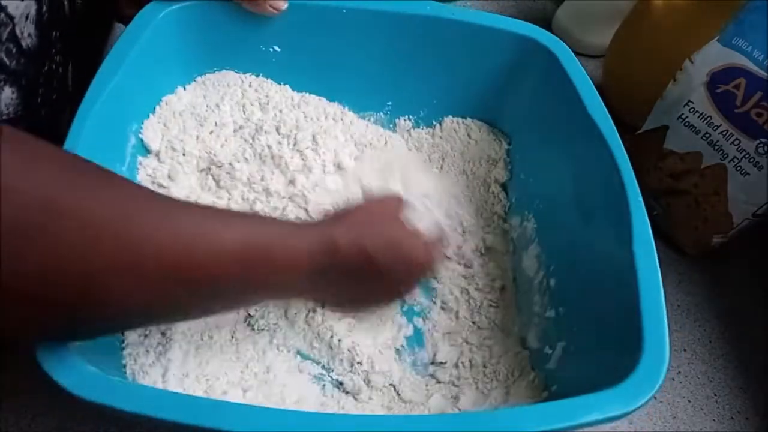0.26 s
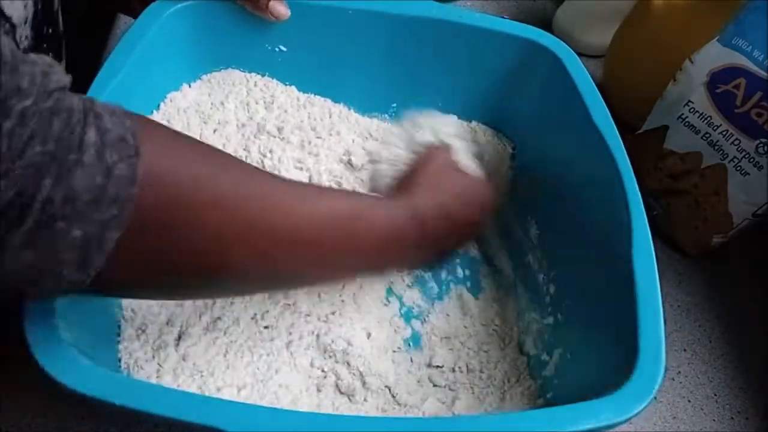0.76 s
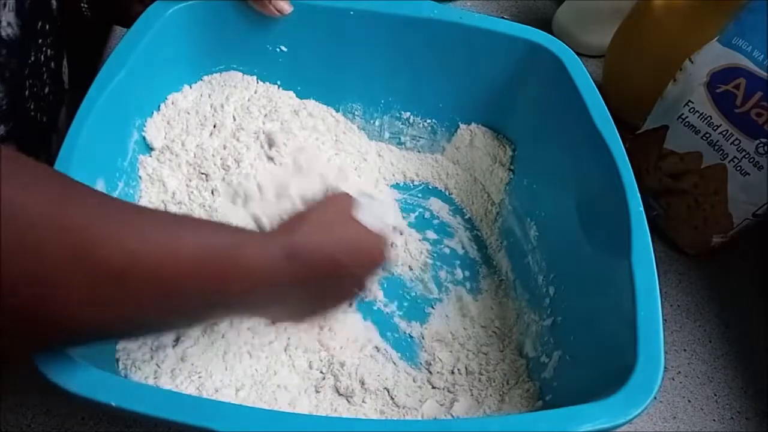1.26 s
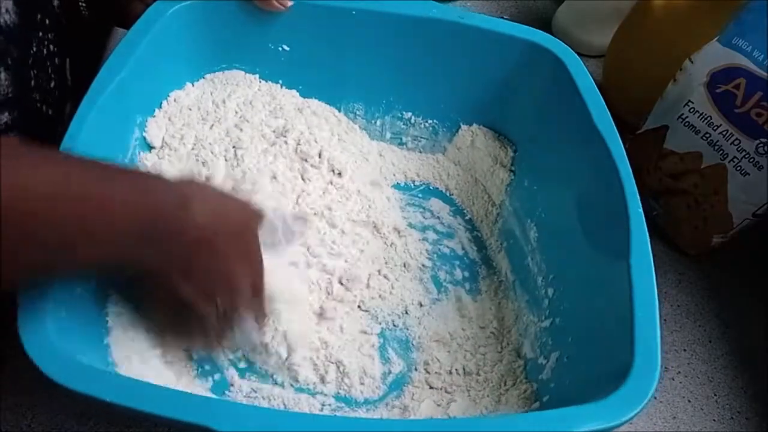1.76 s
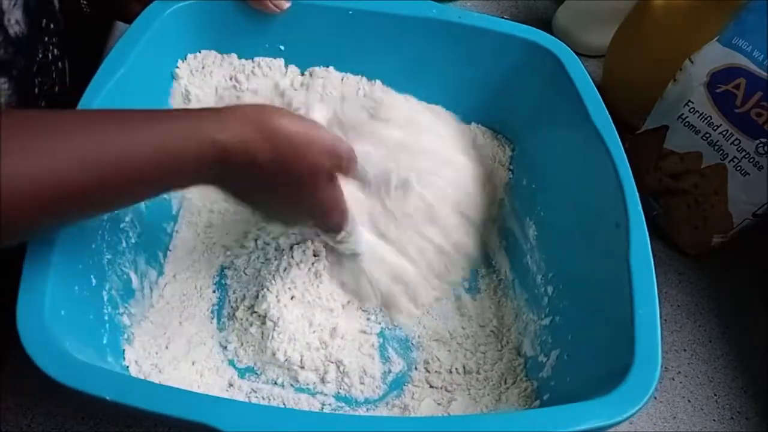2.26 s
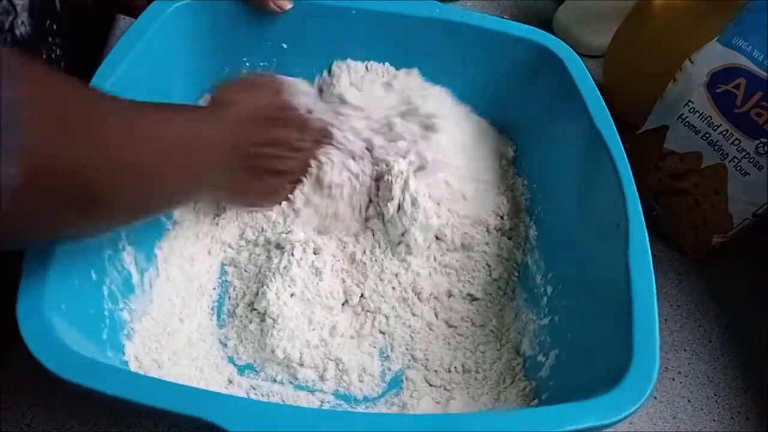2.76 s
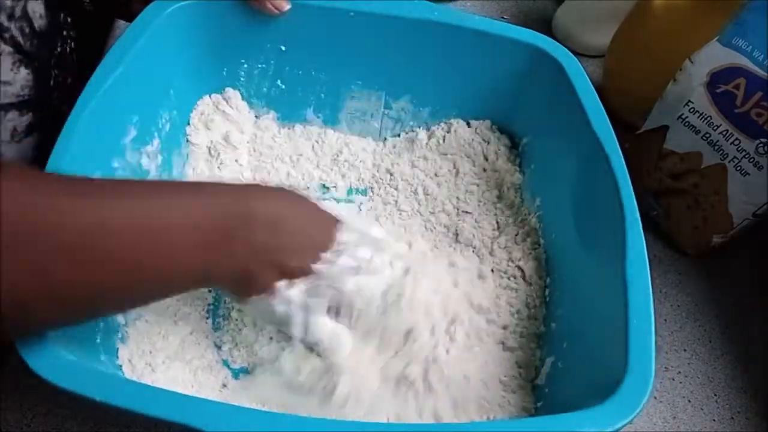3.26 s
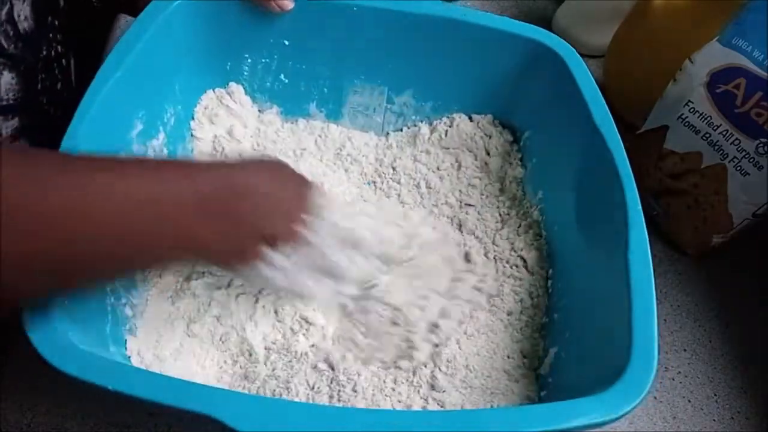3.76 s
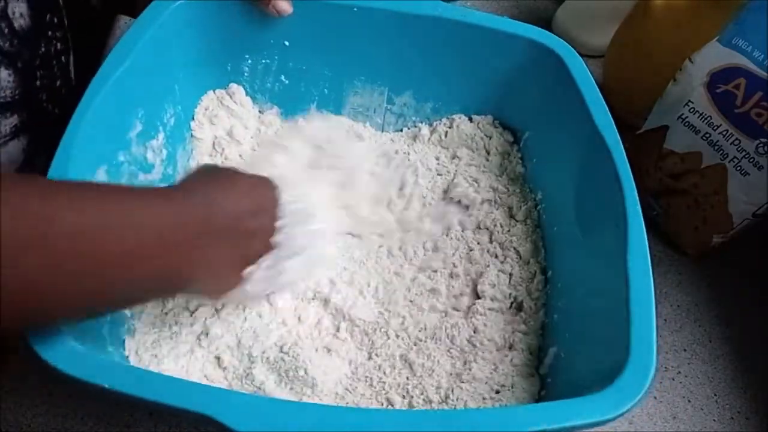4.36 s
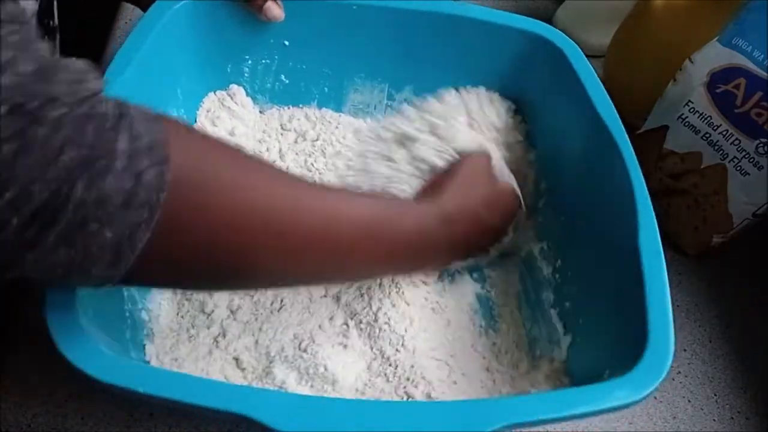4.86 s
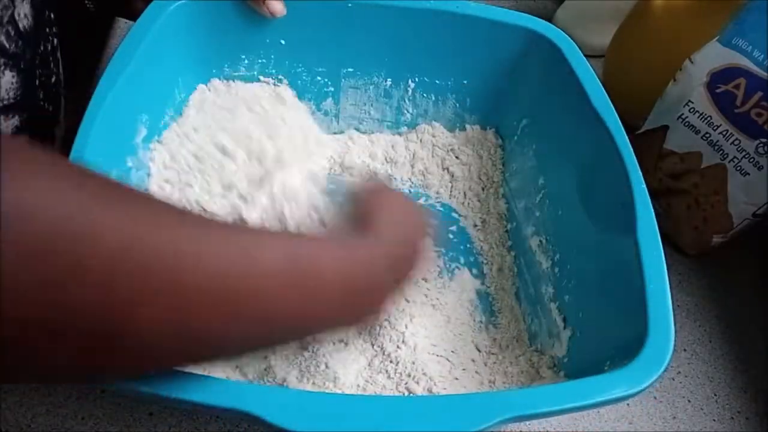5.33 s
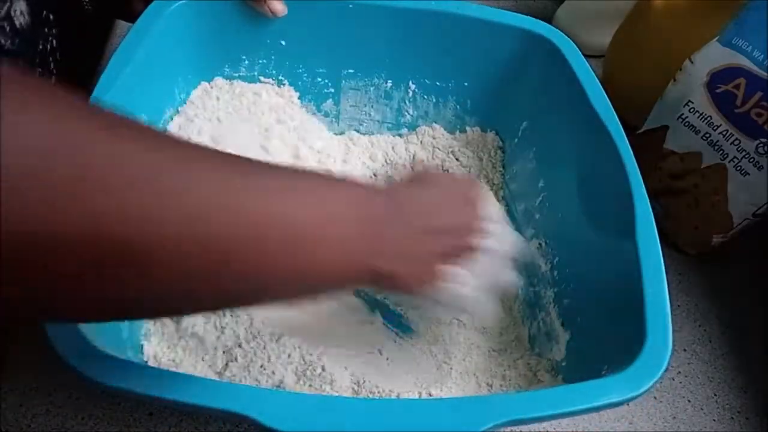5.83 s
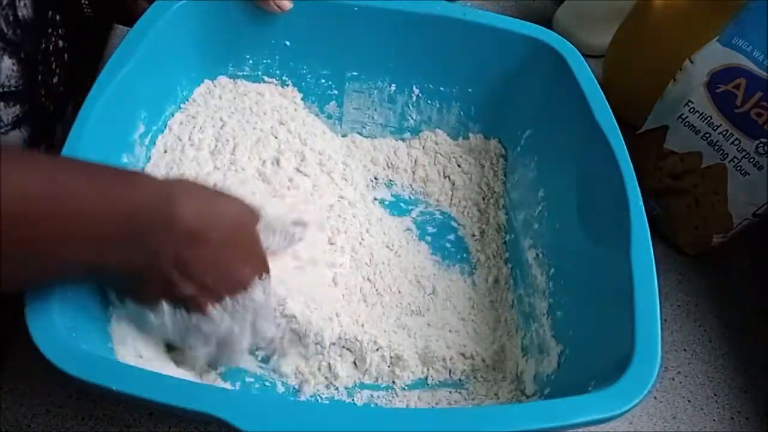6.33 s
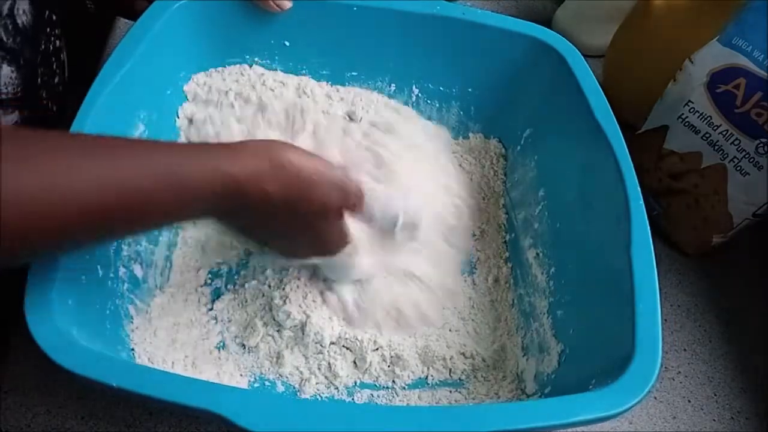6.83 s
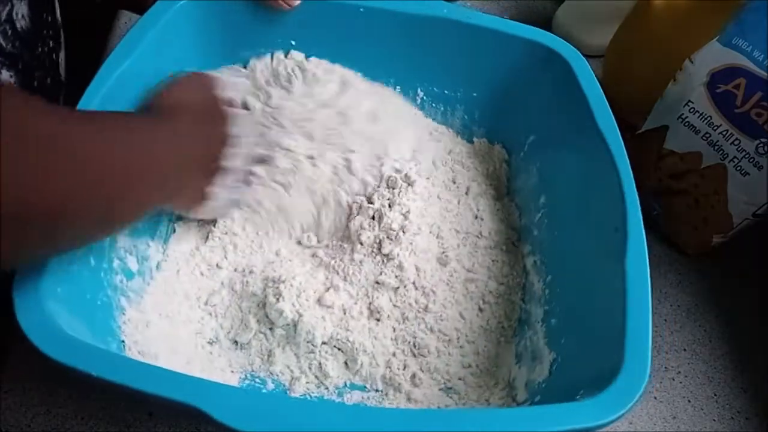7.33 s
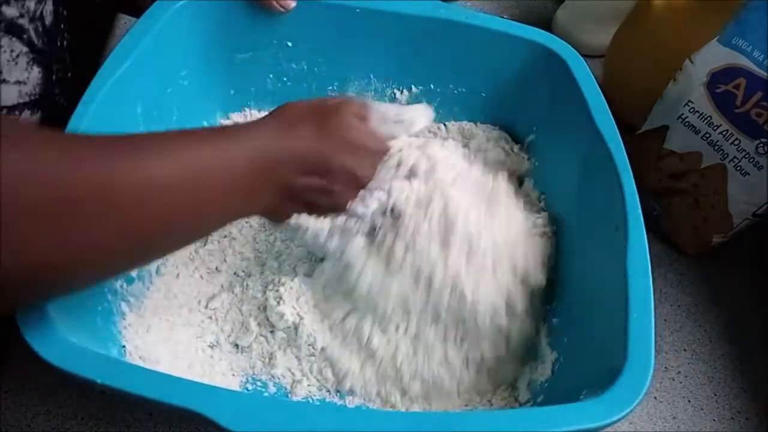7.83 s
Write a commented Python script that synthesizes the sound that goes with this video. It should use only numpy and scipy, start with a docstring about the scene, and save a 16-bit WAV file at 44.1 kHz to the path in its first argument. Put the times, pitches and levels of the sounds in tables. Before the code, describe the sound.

Close above a plastic basin in a small kitchen, a hand stirs dry flour for about eight seconds. Quick strokes of 0.1 to 0.3 seconds begin at once, each a soft, grainy hiss with fingers rasping on plastic and the floor drumming low. Dull thumps and knocks cluster at 0.1, 0.65 and 1.15 seconds; nails scrape around 0.75 and 1.5 to 1.7. From about 1.9 it is sparser, with a knock at 2.25, a faint hollow pop at 2.5 and a scrape at 2.9. Brisk swishes return from 3.35, with a strong knock at 3.7 and another at 4.65. A sharp scrape comes at 5.1, then short strokes near 5.5 and a longer one at 6. Knocks soften; a bright powdery sweep starts at 7.3, a loud, short hollow pop follows at 7.5 with a scrape, and a last light swish at 8. Short room reverberation and faint rumble remain.

```python
"""In a small kitchen, heard from just above, a hand stirs dry flour round a plastic basin.
Each stroke shears the powder into a hiss, rasps the fingers over the plastic and drums the basin's floor,
all made of random clicks that are filtered or drive resonances. Knocks excite decaying modes and short
noise cracks, and nails scrape. One faint hollow pop and, near the end, a loud one ring a pair of resonators
in cascade; a diffuse reverberant field and a faint low rumble surround the basin."""
import sys
import numpy as np
from scipy import signal
from scipy.fft import rfft, irfft
from scipy.io import wavfile

SR = 44100
rng = np.random.default_rng(int(sys.argv[2]) if len(sys.argv) > 2 else 0)


def wav_out(sig):
    """Save sig, one row per channel (or a flat mono array), as 16-bit PCM at SR to the path in sys.argv[1]."""
    wavfile.write(sys.argv[1], SR, np.round(np.clip(np.atleast_2d(sig).T, -1, 1) * 32767).astype(np.int16))


N = 356892
TIME = np.arange(N) / SR


def from_db(db):
    """Logarithmic level: 20 dB is a factor of ten in amplitude."""
    return 10 ** (np.asarray(db) / 20)


def rms_one(x):
    """Normalisation: scale to unit mean power."""
    return x / np.sqrt(np.mean(x ** 2) + 1e-20)


def at_hz(points, hz):
    """Interpolation of a spectrum along a logarithmic frequency axis."""
    f, value = np.transpose(points)
    return np.interp(np.log(np.maximum(hz, 1)), np.log(f), value)


def colour(x, spectrum, size=2048):
    """Minimum-phase filtering: folding the cepstrum gives a causal filter with the stated spectrum."""
    bins_hz = np.arange(size + 1) * SR / (2 * size)
    log_gain = at_hz(spectrum, bins_hz) * np.log(10) / 20
    cepstrum = irfft(log_gain)
    cepstrum[1:size] *= 2
    cepstrum[size + 1:] = 0
    impulse_response = irfft(np.exp(rfft(cepstrum)))
    return signal.oaconvolve(x, impulse_response)[:len(x)]


def drift(rate):
    """Random modulation: chance values, `rate` per second, joined by lines and scaled to unit rms."""
    knots = rng.standard_normal(4096)
    return rms_one(np.interp(TIME * rate, np.arange(len(knots)), knots))


def ring(force, hz, t60):
    """Damped resonance: a unit click starts a sine of height 1 that decays by 60 dB in t60."""
    r = from_db(-60 / (t60 * SR))
    w = 2 * np.pi * hz / SR
    return signal.lfilter([0, np.sin(w)], [1, -2 * r * np.cos(w), r * r], force + 1e-18)


def grains(per_s, spread_db):
    """Granular excitation: random clicks of uneven size and sign, at unit power."""
    sizes = from_db(spread_db * np.minimum(rng.exponential(1, N), 4))
    signs = rng.choice([-1, 1], N)
    return rms_one(sizes * signs * (rng.random(N) < per_s / SR))


# A stroke's shape: flour gives way at once, the speed arches, each sound fades as the hand lifts.
ATTACK_S, ATTACK_DB = 0.023, 14.5
HISS_ARCH_DB, HISS_RELEASE_DB_PER_S = 3.5, 207
RASP_ARCH_DB, RASP_RELEASE_DB_PER_S = 3.5, 102.5
DRUM_ARCH_DB, DRUM_RELEASE_DB_PER_S = 4, 69
RASP_EASING_DB, DRUM_EASING_DB = 3.5, 6  # the pressure on the plastic eases over a stroke

# The hand's strokes through the flour; the levels are those before shaping and later trims.
# Columns: start t/s, length t/s, swell from start to end level/dB,
# powder hiss level/dB, finger rasp level/dB, floor drumming level/dB
STROKES = [(0.132, 0.12, 14.5, -54, -50, -43.5), (0.55, .03, 0, -69.5, -78, -75),
           (0.611, 0.19, 5, -48.5, -50, -45), (0.769, 0.14, 14.5, -56, -58, -55.5),
           (1.106, 0.13, 15.5, -56.5, -57, -42.5), (1.498, 0.14, 16, -54, -63, -54),
           (1.723, 0.24, -9.5, -62, -60.5, -59), (1.93, 0.32, -2, -67.5, -73, -94),
           (2.486, 0.079, 9.5, -63, -59.5, -55.5), (2.591, 0.31, 12.5, -51.5, -64.5, -63),
           (3.09, 0.22, 5, -90, -71.5, -88), (3.368, 0.13, -5.5, -56.5, -61, -54.5),
           (3.553, 0.14, 4.5, -52.5, -75, -59.5), (3.724, 0.26, -5, -55.5, -58, -52),
           (4.081, 0.2, -3.5, -50.5, -67.5, -51.5), (4.235, 0.18, 11.5, -51.5, -58.5, -50.5),
           (4.616, 0.29, 12.5, -53, -52, -50), (5.01, .2, 5.5, -50, -56.5, -60),
           (5.475, 0.099, 1, -47, -55.5, -45), (5.606, 0.084, -13, -55, -75, -51.5),
           (5.921, 0.057, -1, -63, -61, -69), (5.982, 0.3, -2.5, -51, -51.5, -53),
           (6.357, 0.3, -17, -60.5, -64, -66), (6.647, 0.14, 6, -63, -72, -91),
           (7.043, 0.17, 10, -54, -61, -62.5), (7.268, 0.3, 9.5, -46.5, -56.5, -60),
           (8.018, 0.12, 5, -54, -66, -79)]


def stroke_level(levels_db, arch_db, easing_db, release_db_per_s):
    """Envelope of friction: attack, arch and linear release in dB; overlapping strokes add in power."""
    power = np.full(N + SR, 1e-12)
    t = TIME[:SR]
    for (start, length, swell_db, *_), db in zip(STROKES, levels_db):
        way = np.minimum(t / length, 1) - .5  # from -1/2 at the start to 1/2 at the end
        attack = ATTACK_DB * np.minimum(t / ATTACK_S - 1, 0)
        arch = (swell_db - easing_db) * way - arch_db * (2 * way) ** 2
        release = release_db_per_s * np.maximum(t - length, 0)
        power[int(start * SR):][:len(t)] += from_db(2 * (db + attack + arch - release))
    return 10 * np.log10(power[:N])


# Spectrum of the sheared flour. Columns: f/Hz, relative level/dB per Hz
POWDER = [(300, 0), (1000, 0), (2000, 3), (3800, 2), (5000, -3), (6600, -2), (7700, -10), (8800, 3.5),
          (10500, -2.5), (12500, -6), (13700, -5.5), (15000, 5), (16000, 5)]


def powder(hiss_db):
    """Granular shear: countless particles slide past each other in small uneven slides."""
    slides = from_db(2.4 * drift(45))
    grain_noise = rms_one(colour(grains(7000, 4.9), POWDER))
    hiss = from_db(hiss_db - 0.3) * slides * grain_noise
    return diffuse(hiss, POWDER, wet_db=15.5, t60=0.27)


def diffuse(x, spectrum, wet_db, t60):
    """Diffuse field: the moving hand's echoes blur into a like-coloured wash, unrelated at the two ears."""
    r = from_db(-120 / (t60 * SR))  # decay of power, hence twice 60
    energy = signal.lfilter([1 - r], [1, -r], x ** 2)
    wash = np.array([rms_one(colour(rng.standard_normal(N), spectrum)) for _ in range(2)])
    mixed = x + from_db(wet_db) * np.sqrt(energy) * wash
    return mixed / np.sqrt(1 + from_db(2 * wet_db))


# Spectrum of fingers on plastic. Columns: f/Hz, relative level/dB per Hz
RASP = [(60, -2), (240, -2), (350, -2), (700, 2.5), (1000, -3), (1450, -5), (1900, -4), (2600, -13.5),
        (4500, -18.5), (9000, -23.5)]


def rasp(rasp_db):
    """Stick-slip friction: floury fingers catch and release on the plastic."""
    catches = from_db(3.24 * drift(60))
    friction = rms_one(colour(grains(1000, 2.1), RASP))
    return from_db(rasp_db - 1.26) * catches * friction


SKID_DB, SKID_FALL_DB_PER_S = -21, 224  # rasp relative to the wall knock, and its decay


def with_skids(rub_db):
    """Power addition: after each knock the hand skids on, on top of the steady rubbing; level in dB."""
    power = from_db(2 * rub_db)
    t = TIME[:SR // 2]
    for s, wall_db, *_ in KNOCKS:
        skid_db = wall_db + SKID_DB - SKID_FALL_DB_PER_S * t
        power[int(s * SR):][:len(t)] += from_db(2 * skid_db)
    return 10 * np.log10(power)


# The basin's modes, damped by its load; drumming shortens the decay times.
# Columns: f/Hz, relative level/dB, reverberation time t60/s
BASIN = [(71.7, -8, 0.29), (105.3, -3.5, 0.36), (121.4, 3.5, 0.22), (160.8, -5.5, 0.26), (238, -4.5, 0.12),
         (278.4, -6, 0.069), (389.7, -9.5, 0.12), (510, -5, 0.049), (632, -4.5, 0.045), (759, -9, 0.073),
         (866, -14, 0.055), (1260, -18.5, 0.044)]


def drumming(drum_db):
    """Forced vibration: the dragging hand shakes the basin's six lowest modes."""
    band = signal.butter(2, [65, 200], "band", fs=SR, output="sos")
    drag = signal.sosfilt(band, grains(300, 1.0))
    floor = 0
    for k, (hz, db, t60) in enumerate(BASIN[:6]):
        polarity = (-1) ** k
        floor = floor + polarity * from_db(db) * ring(drag, hz, t60 * 0.74)
    return from_db(drum_db - 2.0) * rms_one(floor)


# Hand against basin; nominal levels, which the playing functions trim, vary or stretch.
# Columns: onset t/s, walls' knock level/dB, deep thud level/dB, hard clack level/dB
KNOCKS = [(0.039, -41, -39.5, -58), (0.115, -39, -41, -57), (0.144, -30, -27.5, -52.5),
          (0.621, -39, -35, -57.5), (0.675, -32, -41, -64), (1.139, -32.5, -31, -49.5),
          (1.168, -30, -31, -42.5), (1.697, -38, -45.5, -60), (1.828, -75, -50.5, -62),
          (2.252, -36, -33, -48), (3.335, -38, -40, -62), (3.681, -27, -29, -53), (3.952, -43, -48, -64),
          (4.11, -37, -39, -56), (4.419, -42.5, -38, -50), (4.636, -38.5, -43, -86),
          (4.665, -30, -36.5, -50), (5.465, -36.5, -40.5, -60), (5.502, -43.5, -37, -50.5),
          (5.968, -44.5, -48.5, -70), (6.08, -54, -42.5, -50), (6.377, -51.5, -48, -58),
          (6.8, -55.5, -46.5, -68), (7.065, -52, -60, -65)]


def knocks():
    """Modal excitation: each blow bends the soft floor and rings the stiffer walls."""
    out = np.zeros(N)
    t = TIME[:SR // 2]
    hz, mode_db, t60 = np.transpose(BASIN)[:, :, None]
    stiff = np.clip(np.log2(hz / 150) / 1.23, 0, 1)  # 0 for modes of the floor, 1 for those of the walls
    for s, wall_db, thud_db, _ in KNOCKS:
        place, load = rng.standard_normal((2, len(BASIN), 1))
        pitch = hz * (1 + (0.023 + 0.041 * stiff) * load)  # the shifting flour retunes the modes
        blow_db = (1 - stiff) * (thud_db + 0.2) + stiff * (wall_db + 0.8)
        place_db = (1.23 + 0.74 * stiff) * place
        gain = from_db(mode_db + blow_db + place_db)
        sign = np.where(stiff < .5, 1, rng.choice([-1, 1], hz.shape))
        swell = 1 - np.exp(-t * hz / 0.75)  # flesh hands over its push within a few cycles
        decay = from_db(-60 * t / t60)
        modes = sign * gain * swell * decay * np.sin(2 * np.pi * pitch * t)
        speed = np.diff(modes, prepend=0) * SR / (2 * np.pi * pitch)  # the air follows the plastic's speed
        out[int(s * SR):][:len(t)] += speed.sum(axis=0)
    return out


# Spectrum of a hard contact. Columns: f/Hz, relative level/dB per Hz
CLACK = [(60, -24), (300, 1.5), (800, 6), (1300, 3), (1900, -0.5), (3300, -12.5), (4700, -32.5),
         (12000, -60)]


def clacks(hardening=0.33):
    """Nonlinear contact: knuckles and nails crack briefly, hard blows out of proportion."""
    out = np.zeros(N)
    t = TIME[:SR // 20]
    contact = np.exp(-t / .0011)
    for s, _, _, clack_db in KNOCKS:
        crack = colour(rng.standard_normal(len(t)) * contact, CLACK)
        level_db = clack_db + hardening * (clack_db + 40)
        out[int(s * SR):][:len(t)] += from_db(level_db) * rms_one(crack)
    return out


SCRAPE_RISE_DB, SCRAPE_FALL_DB_PER_S = 14.5, 253  # gained over the rise; lost afterwards

# Spectrum of grit under a nail. Columns: f/Hz, relative level/dB per Hz
GRIT = [(150, -9.5), (400, -1), (750, 4), (1100, 0.5), (1900, -1), (2700, -11), (4000, -18), (9000, -28)]

# Nails break through to the bare plastic and scrape. Columns: peak t/s, level/dB, rise t/s
SCRAPES = [(0.75, -46.5, .03), (1.532, -50.5, 0.019), (1.571, -47, 0.0077), (1.662, -46, 0.018),
           (2.239, -58, 0.042), (2.4, -67.5, 0.027), (2.906, -44.5, 0.054), (3.73, -55.5, 0.018),
           (4.423, -63, 0.025), (5.118, -41.5, 0.014), (6.13, -50, .03), (7.57, -44.5, 0.034)]


def scrapes():
    """Abrasive friction: a nail bites, grinds over coarse grit and slides off."""
    level = 0
    for s, db, rise_s in SCRAPES:
        before = SCRAPE_RISE_DB * (s - TIME) / rise_s
        after = SCRAPE_FALL_DB_PER_S * (TIME - s)
        drop = np.maximum(before, after)
        level = level + from_db(np.maximum(db - drop, -150))
    return level * rms_one(colour(grains(per_s=1200, spread_db=2.5), GRIT))


# Hollow pops of air under the palm; each of two resonators decays by 60 dB in the given cycles.
# Columns: onset t/s, peak level/dB before the room, pitch f/Hz, ringing in cycles
POPS = [(2.507, -42.5, 640, 10), (7.5263, -16.5, 724, 2.07)]


def pops():
    """Cavity resonance: trapped air escapes as a low note through two equal resonators in cascade."""
    out = np.zeros(N)
    for s, db, hz, cycles in POPS:
        click = 1.0 * (np.arange(N) == int(s * SR))
        puff = ring(click, hz, cycles / hz)
        puff = np.diff(ring(puff, hz, cycles / hz), prepend=0)
        out += from_db(db) * puff / np.abs(puff).max()
    return out


# Decay of the kitchen. Columns: f/Hz, reverberation time t60/s
KITCHEN_T60 = [(100, 0.39), (500, 0.43), (2000, 0.3), (6000, 0.14), (15000, 0.1)]
# Reverberant over direct sound, before each source's own shift. Columns: f/Hz, level/dB
KITCHEN_WET = [(60, -35.5), (130, -25), (260, -6.5), (600, -1.5), (1200, 6), (15000, -0.5)]


def kitchen(x, wetter_db, count=12):
    """Reverberation: direct sound plus a two-eared diffuse tail, dying band by band; power is shared."""
    t = TIME[:SR // 2]
    edges = np.geomspace(50, 18000, count + 1)
    wet = [(hz, db + wetter_db) for hz, db in KITCHEN_WET]
    white = rng.standard_normal((2, 2, len(t)))  # two noises, used in turn by the bands, for each ear
    tail = 0
    for k, (low, high) in enumerate(zip(edges, edges[1:])):
        hz = np.sqrt(low * high)
        fade = from_db(-60 * t / at_hz(KITCHEN_T60, hz)) * (t > .003)
        band_filter = signal.butter(2, [low, high], "band", fs=SR, output="sos")
        band = signal.sosfilt(band_filter, white[k % 2])
        dry_over_wet = from_db(-2 * at_hz(wet, hz))  # ratio of powers
        tail = tail + band * fade / np.sqrt(np.sum(fade ** 2) * (1 + dry_over_wet))
    direct_spectrum = [(hz, -10 * np.log10(1 + from_db(2 * db))) for hz, db in wet]
    direct = colour(x, direct_spectrum)
    return direct + signal.oaconvolve(x[None], tail, axes=1)[:, :N]


# Spectrum of the background. Columns: f/Hz, relative level/dB per Hz
ROOM_TONE = [(20, -18), (60, 5), (115, 2), (200, -1.5), (400, -23.5), (1000, -15.5), (2000, -18),
             (4000, -42.5), (9000, -30), (15500, -36)]


def room_tone():
    """Partial coherence: the house's faint rumble is one noise common to the ears plus one for each."""
    left, right, both = (rms_one(colour(rng.standard_normal(N), ROOM_TONE)) for _ in range(3))
    return from_db(-76) * both + from_db(-77.5) * np.array([left, right])


DRUM_WAVER_DB, DRUM_WAVER_PER_S = 1.3, 30  # the drumming wavers as the hand grips and slides


def scene():
    """Superposition: strokes, blows and pops sound in the kitchen over its quiet floor."""
    *_, hiss_db, rasp_db, drum_db = np.transpose(STROKES)
    flow = stroke_level(hiss_db, HISS_ARCH_DB, 0, HISS_RELEASE_DB_PER_S)
    rub = stroke_level(rasp_db, RASP_ARCH_DB, RASP_EASING_DB, RASP_RELEASE_DB_PER_S)
    drag = stroke_level(drum_db, DRUM_ARCH_DB, DRUM_EASING_DB, DRUM_RELEASE_DB_PER_S)
    drag = drag + DRUM_WAVER_DB * drift(DRUM_WAVER_PER_S)
    hiss = powder(flow)
    fingers = kitchen(rasp(with_skids(rub)) + scrapes(), wetter_db=2.0)
    basin = kitchen(drumming(drag) + knocks(), wetter_db=1.0)
    cracks = kitchen(clacks(), wetter_db=-2.5)
    hollows = kitchen(pops(), wetter_db=2.5)
    return hiss + fingers + basin + cracks + hollows + room_tone()


CUTOFF_HZ = 15750

# Balance of the two ports. Columns: f/Hz, left minus right level/dB
BALANCE_DB = [(200, 0.5), (1100, 2), (2700, 1), (6400, -3.5), (8000, 11), (9600, 7.5), (12000, 2.5),
              (15000, -3)]


def record(dry):
    """Band limitation: two microphone ports colour the sound differently; deepest bass and top are cut."""
    ports = []
    for x, side in zip(dry, (1, -1)):
        ports.append(colour(x, [(hz, side * db / 2) for hz, db in BALANCE_DB]))
    ports = signal.sosfilt(signal.butter(2, 50, "high", fs=SR, output="sos"), ports)
    return signal.sosfilt(signal.ellip(12, .2, 80, CUTOFF_HZ, fs=SR, output="sos"), ports)


dry = scene()
out = record(dry)
wav_out(out)
```